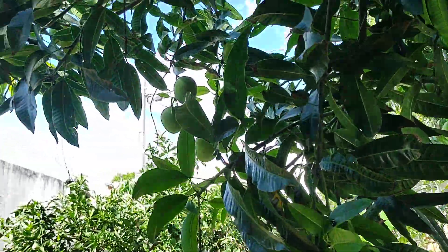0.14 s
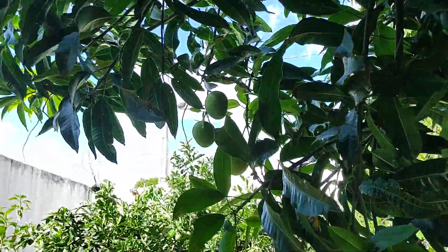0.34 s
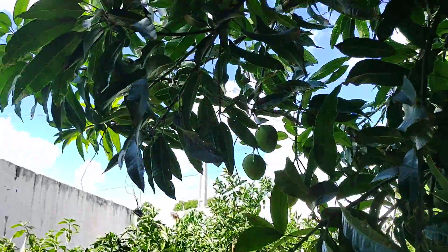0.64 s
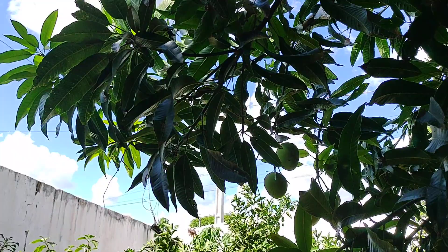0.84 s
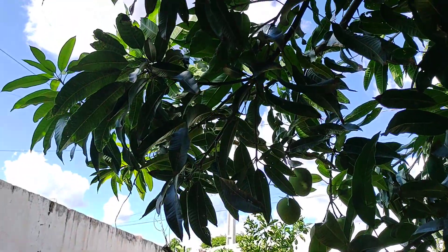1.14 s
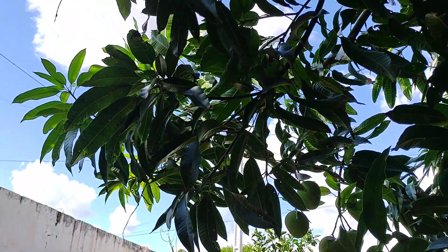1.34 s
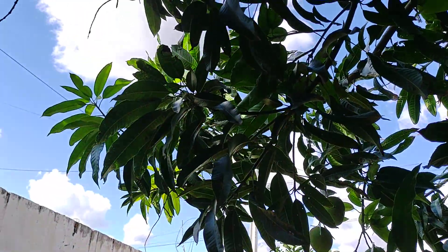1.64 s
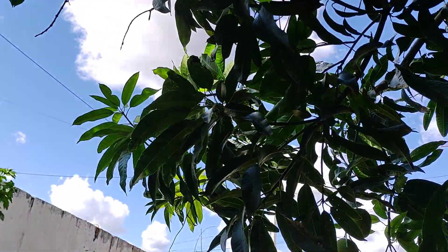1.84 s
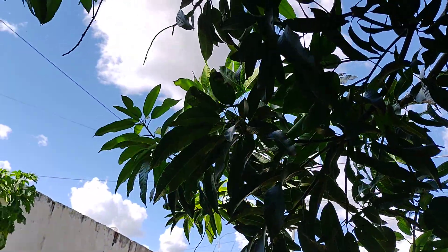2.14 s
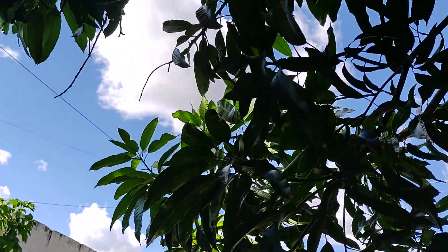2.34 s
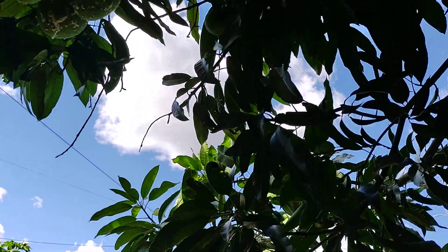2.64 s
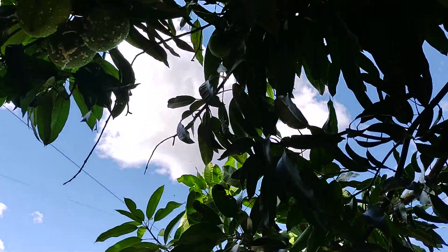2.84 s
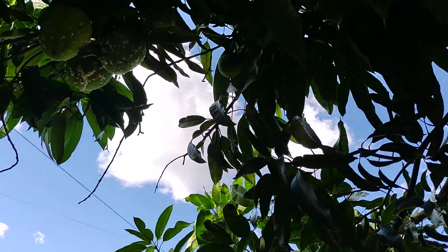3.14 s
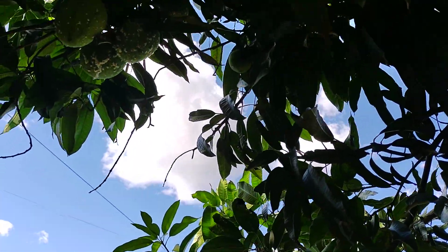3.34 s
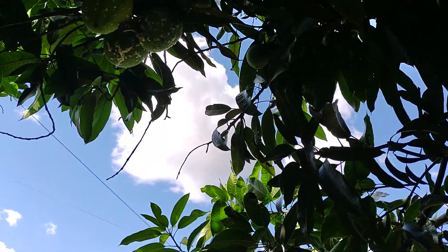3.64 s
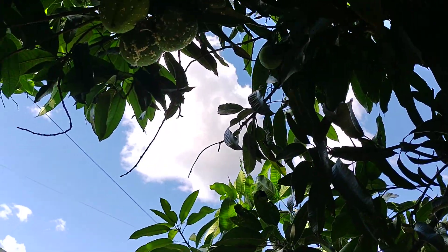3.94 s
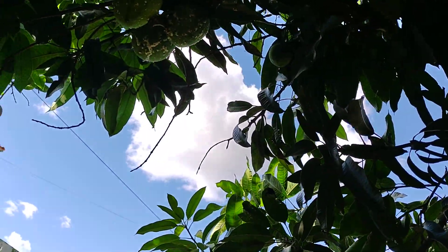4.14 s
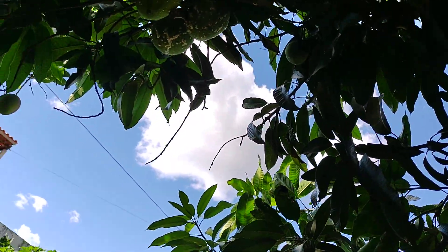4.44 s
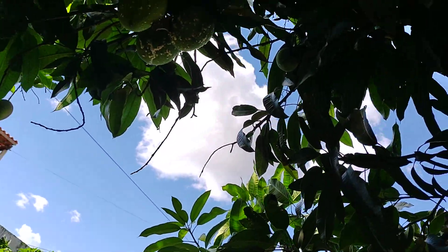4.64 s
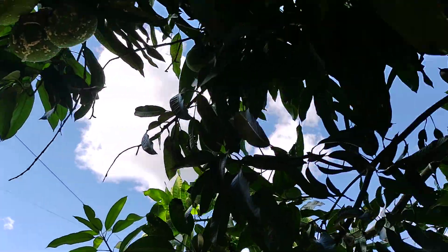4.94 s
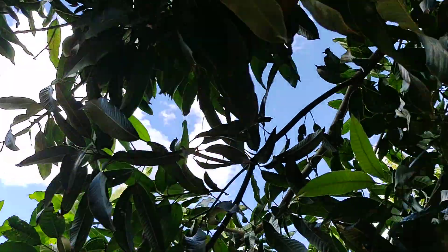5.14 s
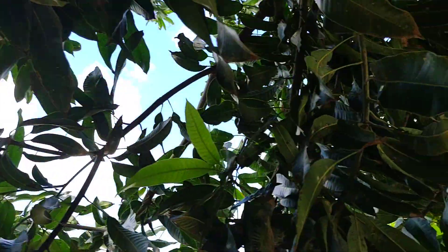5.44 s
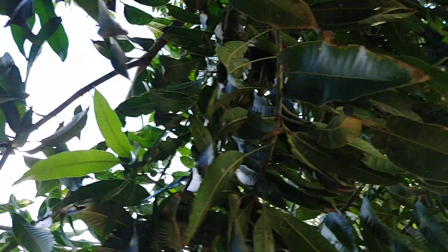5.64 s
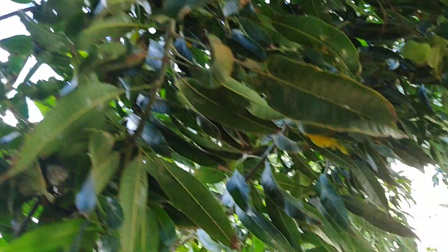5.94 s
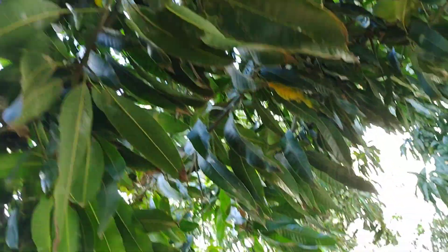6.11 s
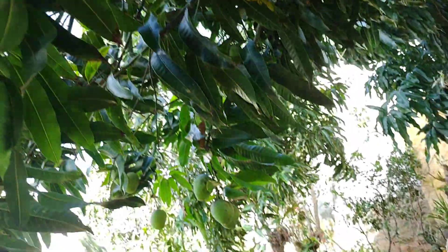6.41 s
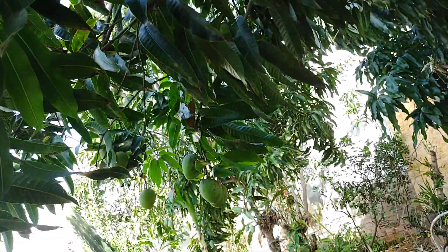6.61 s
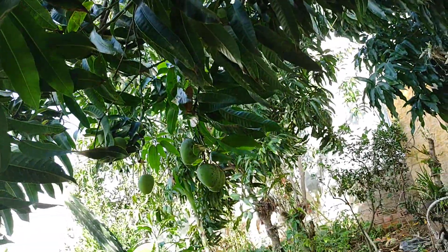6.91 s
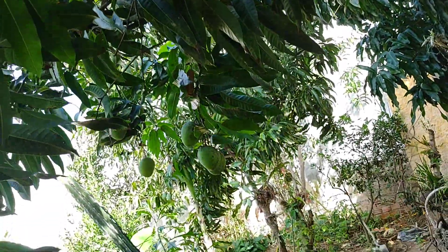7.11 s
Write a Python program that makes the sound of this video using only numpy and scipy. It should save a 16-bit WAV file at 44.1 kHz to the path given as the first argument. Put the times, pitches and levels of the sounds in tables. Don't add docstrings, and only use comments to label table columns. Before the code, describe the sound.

Wind stirs stiff mango leaves right beside a handheld phone in a walled garden. Bursts of dry hiss and crackling snaps come first, then a lull broken by one sharp twig crack with a short slap off the walls. Gusts return in uneven waves to the end. Small birds chip faintly behind, over a very low distant engine and traffic rumble.

```python
import sys
import numpy as np
from scipy import signal
from scipy.fft import rfft, irfft, next_fast_len
from scipy.io import wavfile
from scipy.ndimage import uniform_filter1d, map_coordinates

SR = 44100
rng = np.random.default_rng(int(sys.argv[2]) if len(sys.argv) > 2 else 0)


def volts_from_decibels(level):
    exponent = np.asarray(level, float) / 20
    return 10 ** exponent


def waveform_to_disk(signal):
    frames = np.transpose(np.atleast_2d(signal))
    scaled = np.clip(frames, -1, 1) * 32767
    samples = np.round(scaled).astype(np.int16)
    wavfile.write(sys.argv[1], SR, samples)


N = 320607

# peak_s, hiss_db, rise_s (per 10 dB), fall_s (per 10 dB), lightness_db
GUSTS = [(0.022, -42.6, 0.037, 0.319, -2.7), (0.275, -34.6, 0.119, 0.309, -3.5),
         (0.613, -29.4, 0.03, 0.036, -2.6), (0.924, -33.8, 0.039, 0.063, 0.8),
         (1.165, -30.5, 0.198, 0.069, -0.4), (1.472, -55.4, 0.04, 0.042, 15.0),
         (2.22, -44.4, 0.105, 0.156, -0.5), (2.523, -38.5, 0.09, 0.036, -1.8),
         (2.641, -43.8, 0.039, 0.314, -3.2), (2.857, -32.3, 0.132, 0.109, -0.3),
         (3.052, -35.0, 0.054, 0.123, -0.4), (3.461, -43.5, 0.02, 0.6, 1.4),
         (3.655, -36.6, 0.082, 0.302, -3.5), (3.851, -32.1, 0.127, 0.213, -1.3),
         (4.208, -28.8, 0.028, 0.061, 15.0), (4.42, -34.6, 0.29, 0.339, -2.1),
         (4.841, -28.7, 0.096, 0.114, -2.4), (5.107, -38.7, 0.119, 0.182, -2.2),
         (5.304, -39.2, 0.227, 0.045, 6.1), (5.83, -41.7, 0.112, 0.169, 7.8),
         (6.064, -42.2, 0.059, 0.6, 3.2), (6.409, -26.4, 0.074, 0.1, -1.4),
         (6.743, -35.4, 0.098, 0.038, -0.6), (7.069, -43.5, 0.039, 0.142, -1.6)]
# peak_s, hiss_db, lightness_db
FLURRIES = [(0.176, -45.5, -5), (0.504, -35, -4), (0.546, -30.5, 12.1), (0.681, -42, -4.5),
            (0.813, -43, 2.6), (1.249, -41.5, -0.5), (1.375, -73, 9), (1.853, -63, 12.0),
            (1.92, -51.5, 1.7), (2.029, -54.5, -4.5), (2.108, -54, -3), (2.352, -42.5, 25),
            (2.394, -52.5, -8), (2.611, -38.5, -2.5), (3.131, -44.0, -4), (3.228, -40, -2.5),
            (3.379, -47.4, 6), (4.186, -36.5, -2.5), (4.577, -38.5, -3), (4.786, -48, -9.5),
            (5.041, -51, -5), (5.213, -44, -4.2), (5.383, -45, -3.3), (5.513, -45, 3.8), (6.203, -48, -3),
            (6.488, -50, -7), (6.599, -41, -0.5), (6.804, -37.5, 3), (7.186, -42, 0.5), (7.266, -42, 19)]
FLURRY_RISE_S, FLURRY_FALL_S = 0.029, 0.076
# over_brisk_db, loss_db (per dB of lightness), growth_db (per dB of wind)
ANSWERS = [
    (4, -0.01, 1.0161),
    (-2, 0.16, 1.04),
    (-7, 1.12, 1.03),
    (-13.5, 1.56, 0.93),
    (-26.5, 3, 1.3854),
]
BRISK_DB = -35
RESTING_DB = -72
# time_s, branch_level_db
FACING = [(0, -5.5), (.15, 2.5), (.65, -0.5), (.78, -0.5), (1.3, 0), (2.2, -5), (3.1, 0), (3.45, -1.5),
          (3.62, -1), (3.8, 2), (4.1, 0), (4.6, 1.5), (5.0, 2), (5.4, -5), (6.0, 1), (6.7, 2), (7.1, 0),
          (7.27, -3)]

# pitch_hz, level_db (per Hz)
HISS_COLOUR = [(2400, -33.5), (3200, -6), (3800, 0.5), (4600, 1), (6900, 0), (7800, -2), (8900, -14),
               (9500, -38)]
# pitch_hz, level_db (per Hz)
TIP_COLOUR = [(1500, -40.5), (2100, -6.5), (2500, -2.5), (3200, -2), (3800, -9), (5000, -30)]
# pitch_hz, level_db (per Hz)
BLADE_COLOUR = [(600, -41.5), (950, -11.5), (1300, -2), (1900, -1), (2400, -8), (3200, -39.5)]
# pitch_hz, level_db (per Hz)
BRANCH_COLOUR = [(330, -39), (480, -6.5), (600, -0.5), (900, 1), (1150, 0), (1500, -51)]
# pitch_hz, level_db (per Hz)
BOUGH_COLOUR = [(110, -31.5), (180, -12.5), (280, -3), (440, 2), (540, -2.5), (700, -38)]

# start_s, peak_db, ring_hz, low_part_db
SNAPS = [(0.0374, -29, 1050, -16), (0.4903, -8, 4150, -24), (0.5006, -5, 3270, -25),
         (0.5401, -14, 3420, -22), (0.554, -13.5, 3600, -20), (0.6014, -7.5, 3900, -31),
         (0.7183, -22, 4340, -12), (0.8115, -17.5, 3670, -30), (1.087, -11, 3990, -17),
         (1.577, -43, 4210, -24), (1.8484, -36, 4390, -26), (1.895, -43, 4240, -18),
         (1.9151, -28, 5140, -9), (2.116, -23.5, 3860, -20), (2.216, -24.5, 2290, -26),
         (2.2461, -21.5, 3660, -26), (2.413, -17.5, 4880, -27), (3.1214, -17, 1310, -8),
         (3.3696, -22, 2920, -30), (4.1617, -23, 6550, -15), (4.1868, -13, 4400, -21),
         (4.212, -14, 4560, -16), (5.09, -16.5, 6300, -3.5), (5.2324, -9.5, 4800, -23),
         (5.383, -20, 2000, -13), (6.4033, -12, 5040, -23), (6.729, -10, 3700, -49.5),
         (6.753, -15, 2380, -30), (6.8041, -13.5, 3600, -6), (7.2015, -23, 4300, -24)]
# pitch_hz, level_db, fade_s (to -60 dB)
TWIG_MODES = [(1850, -24, 0.025), (2630, -19.5, 0.025), (4270, -20, 0.022), (6450, 0, 0.0063),
              (6900, -10, 0.0085)]
# delay_s, level_db
TWIG_ECHOES = [(.0019, -10), (.0045, -12), (.0078, -14), (.0098, -8), (.0152, -18)]
# pitch_hz, level_db (per Hz)
TWIG_TAIL_COLOUR = [(180, -32), (300, -30), (1100, -20.5), (1800, -12), (2280, -15.5), (2740, -13.5),
                    (6340, -11), (7710, -10.5), (8500, -36), (11000, -52), (18700, -120)]

# start_s, length_s, first_hz, level_db
CHIPS = [(0.724, 0.087, 4300, -47), (1.255, .05, 4200, -39), (1.696, 0.062, 4110, -46),
         (2.301, 0.048, 4290, -45), (3.441, 0.066, 4290, -44), (4.06, .07, 4240, -43.5),
         (4.645, 0.063, 4270, -49), (5.179, 0.037, 4270, -41), (5.78, 0.12, 4330, -44.5),
         (7.029, .07, 4295, -38)]
CHIP_SAG_HZ_PER_S, CHIP_WARBLE_HZ = 720, 86
# start_s, length_s, first_hz, last_hz, level_db
SLURS = [(1.695, .16, 4980, 5200, -56), (3.38, .04, 4550, 4500, -65), (5.635, 0.057, 4800, 4750, -54),
         (5.685, .045, 4900, 5290, -41), (5.735, .055, 5160, 5150, -42), (6.045, .03, 4500, 4600, -49),
         (6.169, .06, 4480, 4830, -51), (6.247, .075, 4930, 5210, -40), (6.849, .049, 5170, 5130, -44),
         (7.249, .04, 4760, 4720, -50.5)]
SLUR_WARBLE_HZ = 150
# start_s, length_s, first_hz, last_hz, level_db
COOS = [
    (2.15, 0.21, 493, 566, -68),
    (2.34, 0.22, 798, 808, -59.5),
    (2.62, .17, 470, 499, -67),
]
COO_WARBLE_HZ = 25
# start_s, length_s, swell_s, level_db
CHATTER = (1.68, .26, .07, -52)
# pitch_hz, level_db (per Hz)
CHATTER_COLOUR = [(3150, -40), (3350, -2.5), (4200, 0.5), (5250, -6), (5420, -40)]

# time_s, shaft_hz, drone_db
ENGINE = [(0, 35.7, -57), (1, 34.6, -59), (2.5, 34.3, -59), (3.5, 34.2, -57), (4.1, 33, -61),
          (4.7, 33, -68), (5.5, 33.2, -60), (6.2, 35.6, -57), (7.27, 35.8, -56)]
# multiple_of_shaft, level_db
ENGINE_ORDERS = [(.7, -8.5), (1, 2), (3, -12), (4, -8), (5, -18), (8, -18.5)]
# time_s, firing_hz, level_db
TRAFFIC = [(0, 78, -62), (.3, 77.2, -53), (.6, 89, -63), (2.04, 85.36, -59.5), (2.7, 82.3, -73),
           (4.11, 85.6, -54.5), (4.5, 89.1, -68.5), (6.2, 96.1, -70), (6.62, 72.7, -54), (7.27, 77.6, -57)]
# time_s, level_db
TOWN = [(0.0, -51), (0.04, -49), (0.4, -56), (2.59, -58), (3.89, -44.5), (4.39, -60), (6.07, -57),
        (6.4, -52), (7.27, -53.5)]
# pitch_hz, level_db (per Hz)
RUMBLE_COLOUR = [(8.8, -37), (15, 0), (27, -5), (54, 0), (86, 5.5), (171, -6), (193, -10.5), (260, -13.5),
                 (340, -42.5), (570, -120)]
# pitch_hz, level_db (per Hz)
STILL_AIR_COLOUR = [(150, -48.5), (230, -1), (500, -4.5), (900, -5.5), (1500, -17), (5790, -7),
                    (7440, -10.5), (8500, -39.5)]
STILL_AIR_DB = -63

# time_s, low_hz, high_hz, level_db
SLIPS = [
    (3.249, 5150, 8260, -45.5),
    (3.901, 5600, 7100, -34),
]


def unit(x):
    return x / np.sqrt(np.mean(x ** 2) + 1e-20)


def curves(rows):
    s, *columns = np.transpose(rows)
    return [np.interp(np.arange(N) / SR, s, column) for column in columns]


def wobble(rate, count=N):
    knots = np.arange(0, count * rate / SR + 1, 1 / 8)
    smooth = map_coordinates(rng.standard_normal(int(knots[-1]) + 4), [knots])
    return np.interp(np.arange(count) * rate / SR, knots, smooth)


def coloured(x, spectrum):
    m = next_fast_len(len(x) + 8192)
    hz, db = np.transpose(spectrum)
    bins_hz = np.fft.rfftfreq(m, 1 / SR)
    gain = volts_from_decibels(np.interp(np.log(bins_hz + 1), np.log(hz + 1), db, -120, -120))
    return unit(irfft(rfft(x, m) * gain, m)[:len(x)])


def patchy(patchy_db):
    z = signal.stft(rng.standard_normal(N), nperseg=512)[2]
    field = uniform_filter1d(rng.standard_normal(z.shape), size=8, axis=0)
    field = uniform_filter1d(field, size=6, axis=1)
    return signal.istft(z * volts_from_decibels(patchy_db * unit(field)), nperseg=512)[1][:N]


def wind():
    flurries = [(s, db, FLURRY_RISE_S, FLURRY_FALL_S, light) for s, db, light in FLURRIES]
    s, db, rise, fall, light = np.transpose(list(GUSTS) + flurries)[..., None]
    t = np.arange(0, N / SR + .004, .002)
    before = (s - t) / np.maximum(rise, .005)
    after = (t - s) / np.maximum(fall, .005)
    away = np.where(t < s, before, after)
    power = volts_from_decibels(2 * (db - BRISK_DB - 10 * away))
    gains = []
    for over_db, loss, growth in ANSWERS:
        felt = np.sum(volts_from_decibels(-2 * loss * light) * power, axis=0)
        gain = volts_from_decibels(BRISK_DB + over_db) * felt ** (growth / 2)
        gains.append(np.interp(np.arange(N) / SR, t, gain))
    return gains


def contacts(rate, spread_db, life):
    draws = rng.random((3, N))
    touches = draws[0] < rate / SR
    sizes = touches * volts_from_decibels(np.minimum(-spread_db * np.log(1 - draws[1]), 12))
    fade = signal.lfilter([1], [1, -np.exp(-1 / (life * SR))], sizes)
    return unit(fade * (draws[2] - .5))


def foliage(hiss, tips, blades, branches):
    flutter = volts_from_decibels(.5 * wobble(22) + .65 * wobble(45))
    crackle = contacts(rate=500, spread_db=2.5, life=0.0018)

    def layer(colour, crackle_share, own_db):
        own_flutter = volts_from_decibels(own_db * wobble(15))
        rubbing = patchy(patchy_db=1.33) + crackle_share * crackle
        return coloured(flutter * own_flutter * rubbing, colour)

    return (hiss * layer(HISS_COLOUR, 0.64, 0.14) + tips * layer(TIP_COLOUR, 0.21, 0.53)
            + blades * layer(BLADE_COLOUR, 0.74, 0.87) + branches * layer(BRANCH_COLOUR, 0.33, 1.2))


def boughs(sway):
    return sway * volts_from_decibels(1.7 * wobble(14)) * coloured(patchy(patchy_db=2.5), BOUGH_COLOUR)


def snaps():
    out, t = np.zeros(N + SR), np.arange(SR // 8) / SR
    low_band = signal.butter(2, [600, 2500], "band", fs=SR)
    for s, db, ring_hz, low_db in SNAPS:
        crack_and_rattle = volts_from_decibels(-60 * t / .008) + .35 * volts_from_decibels(-60 * t / .06)
        burst = rng.standard_normal(len(t)) * crack_and_rattle * (1 - np.exp(-t / .0002))
        leaf = signal.lfilter(*signal.iirpeak(ring_hz, 1.3, SR), burst)
        ring = 0.53 * volts_from_decibels(-60 * t / 0.014) * np.sin(2 * np.pi * ring_hz * t)
        low = volts_from_decibels(low_db + 2.5) * signal.lfilter(*low_band, burst)
        out[round((s + .0007) * SR):][:len(t)] += volts_from_decibels(db - 4) * (ring + leaf + low)
    return out[:N]


def twig():
    out, t = np.zeros(N + SR), np.arange(SR // 4) / SR
    crack = sum(volts_from_decibels(db - 60 * t / fade_s) * np.sin(2 * np.pi * hz * t) for hz, db, fade_s in TWIG_MODES)
    crack = crack * (1 - np.exp(-t / 0.00025)) / np.max(abs(crack))
    direct = (0.00024, 0)
    for delay, db in [direct] + list(TWIG_ECHOES):
        out[round((1.9571 + delay) * SR):][:len(t)] += volts_from_decibels(db + 2.0) * crack
    fading = volts_from_decibels(-21.0 - 60 * t / 0.088) + volts_from_decibels(-35.0 - 60 * t / 0.64)
    tail = fading * coloured(rng.standard_normal(len(t)), TWIG_TAIL_COLOUR)
    out[round(1.9585 * SR):][:len(t)] += tail
    return out[:N]


def birds():
    out = np.zeros(N + SR)
    waver = volts_from_decibels(3.2 * wobble(110))
    chips = [(s, length, hz, hz - CHIP_SAG_HZ_PER_S * length, db) for s, length, hz, db in CHIPS]
    voices = [(chips, CHIP_WARBLE_HZ), (SLURS, SLUR_WARBLE_HZ), (COOS, COO_WARBLE_HZ)]
    for notes, depth_hz in voices:
        for s, length, first_hz, last_hz, db in notes:
            at = min(round(s * SR), N - 1)
            u = np.linspace(0, 1, round(length * SR))[:N - at]
            warble = np.tanh(1.4 * wobble(380, count=len(u)))
            hz = first_hz + (last_hz - first_hz) * u + depth_hz * warble
            swell = np.clip(6 * u, 0, 1) * np.clip(6 * (1 - u), 0, 1)
            whistle = np.sin(2 * np.pi * np.cumsum(hz) / SR)
            out[at:][:len(u)] += volts_from_decibels(db + 1.5) * swell * whistle
    calls = out[:N]
    t = np.arange(SR // 3) / SR
    echoes = rng.standard_normal(len(t)) * volts_from_decibels(-60 * t / .4) * (t > .012)
    wet = signal.fftconvolve(waver * calls, echoes / np.linalg.norm(echoes))[:N]
    return waver * (calls + volts_from_decibels(-7) * wet)


def chatter():
    s, length, swell_s, db = CHATTER
    t = np.arange(N) / SR - s
    hz = 4300 + 1100 * np.tanh(wobble(1500))
    buzz = np.sin(2 * np.pi * np.cumsum(hz) / SR)
    swell = np.clip(np.minimum(t, length - t) / swell_s, 0, 1)
    return volts_from_decibels(db + 1.5 * wobble(70)) * swell * coloured(buzz, CHATTER_COLOUR)


def engine():
    shaft_hz, drone_db = curves(ENGINE)
    turn = 2 * np.pi * np.cumsum(shaft_hz) / SR
    drone = np.zeros(N)
    for multiple, db in ENGINE_ORDERS:
        level = volts_from_decibels(db + 0.7 + 2.6 * wobble(2.7))
        drone += level * np.sin(multiple * turn + 0.81 * wobble(5.4))
    return volts_from_decibels(drone_db) * drone


def traffic():
    firing_hz, vehicle_db = curves(TRAFFIC)
    beat = 2 * np.pi * np.cumsum(firing_hz) / SR + 1.0 * wobble(6.8)
    hum = np.sin(beat) + volts_from_decibels(-13.5) * np.sin(2 * beat)
    return volts_from_decibels(vehicle_db + 4.6 * wobble(2.5)) * hum


def town_rumble():
    rumble_db, = curves(TOWN)
    return volts_from_decibels(rumble_db + 1.2 * wobble(3.3)) * coloured(patchy(patchy_db=2.0), RUMBLE_COLOUR)


def still_air():
    return volts_from_decibels(STILL_AIR_DB + 0.77 * wobble(5.4)) * coloured(patchy(patchy_db=5.0), STILL_AIR_COLOUR)


def scene():
    hiss, tips, blades, branches, sway = wind()
    facing = volts_from_decibels(curves(FACING)[0])
    trees = foliage(hiss, tips, blades, facing * branches)
    trees = trees + boughs(facing * np.hypot(sway, volts_from_decibels(RESTING_DB)))
    animals = birds() + chatter()
    distance = engine() + traffic() + town_rumble() + still_air()
    return np.tile(trees + snaps() + twig() + animals + distance, (2, 1))


def roll_off(x):
    return signal.sosfilt(signal.butter(12, 8760, fs=SR, output="sos"), x)


def record(dry):
    kept = signal.sosfilt(signal.cheby2(12, 60, 8950, fs=SR, output="sos"), dry)
    t, apart = np.arange(N) / SR, np.zeros(N)
    for s, low_hz, high_hz, db in SLIPS:
        edges = [(low_hz - 150, -60), (low_hz, 0), (high_hz, 0), (high_hz + 150, -60)]
        band = coloured(rng.standard_normal(N), edges)
        moment = np.cos(np.clip((t - s) / 0.017, -1, 1) * np.pi / 2)
        apart += volts_from_decibels(db) * band * moment
    return roll_off(kept + [apart, -apart])


dry = scene()
out = record(dry)
waveform_to_disk(out)
```